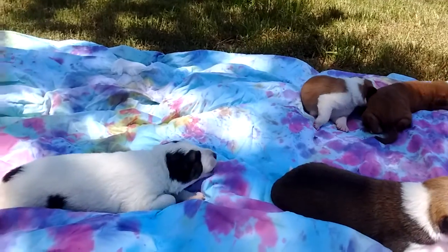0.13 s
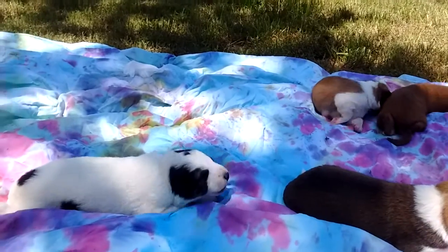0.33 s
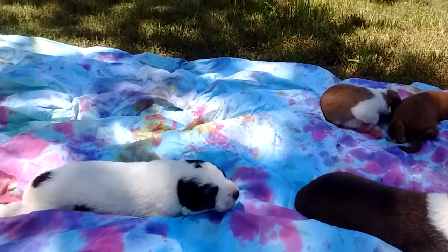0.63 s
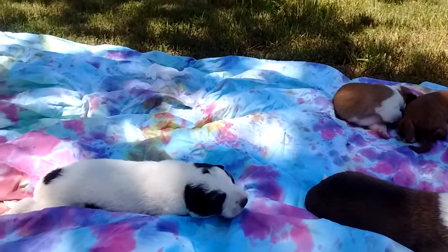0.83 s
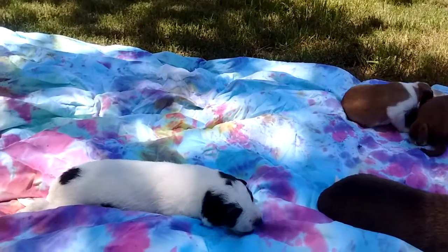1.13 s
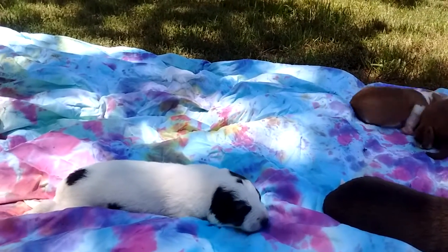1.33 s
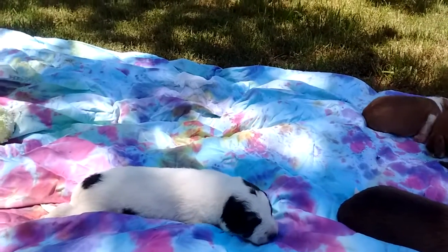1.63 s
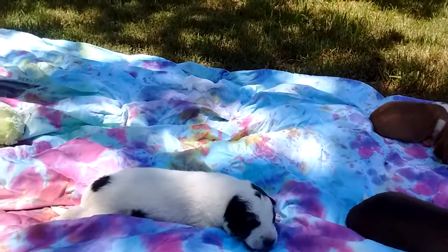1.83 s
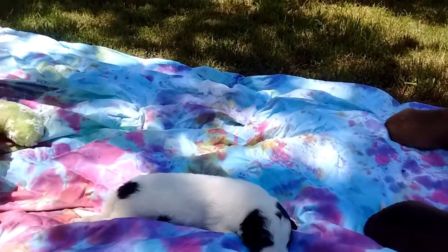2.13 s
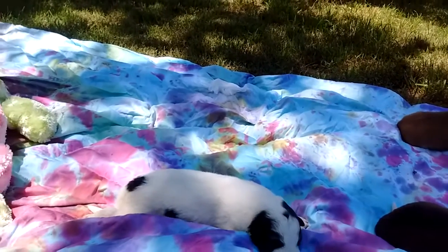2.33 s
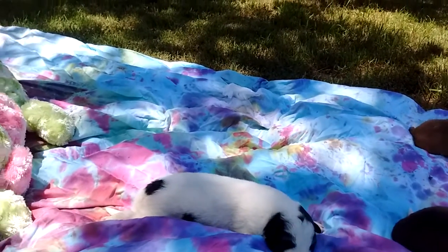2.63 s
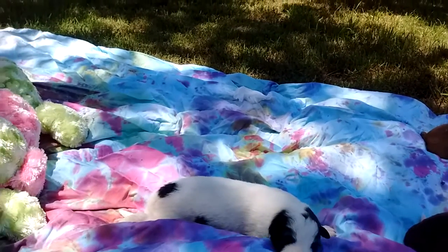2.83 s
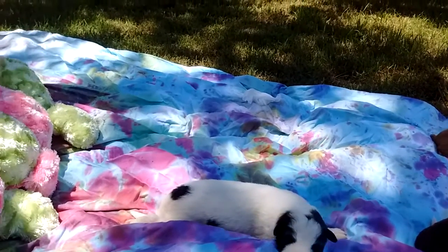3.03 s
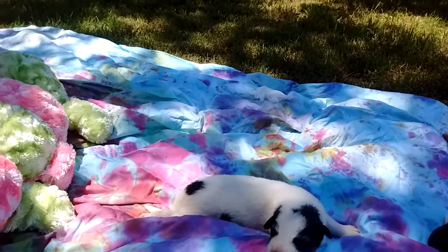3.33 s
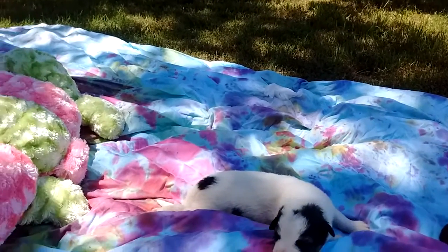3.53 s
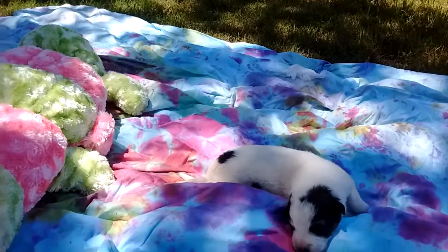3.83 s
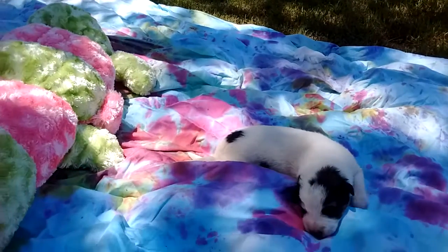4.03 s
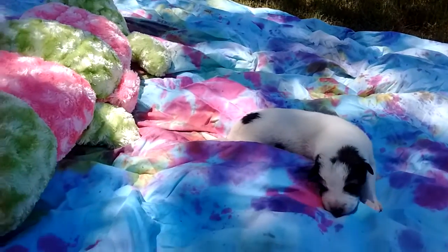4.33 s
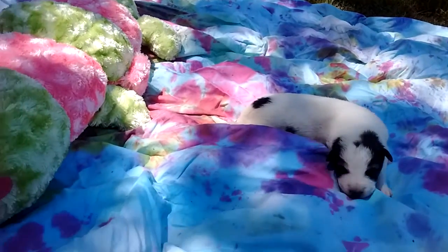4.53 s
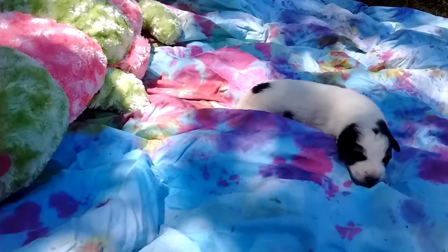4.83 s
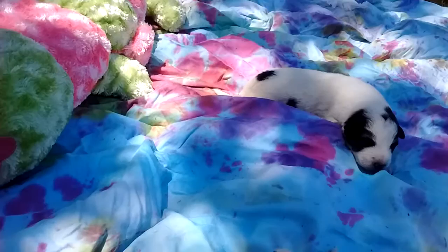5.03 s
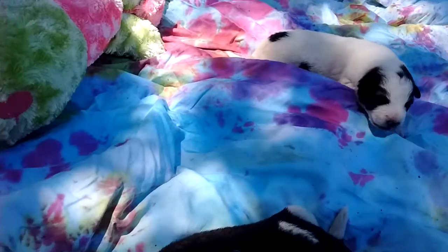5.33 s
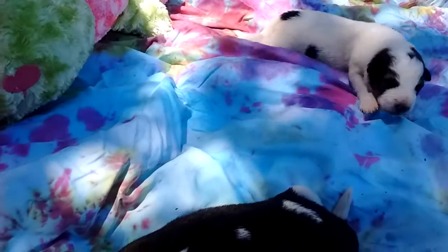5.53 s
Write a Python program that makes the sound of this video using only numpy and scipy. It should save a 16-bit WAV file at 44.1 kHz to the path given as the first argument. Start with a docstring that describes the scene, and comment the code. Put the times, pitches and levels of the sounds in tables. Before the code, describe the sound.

Outdoors, close to a small stereo microphone, a litter of puppies cries in overlapping high voices. A short whine and a squeal open, then a long howl rises and sinks; sharp yelps, whines, squeals and rasping croaks crowd around four more howls. A late pup and a small one finish. Behind them lie a faint airy hush and soft lumpy wind rumble.

```python
"""Young puppies on a blanket outdoors, close to a small two-port microphone, over a faint hush and lumpy low wind.
A far pup and a yapper open, a squeal follows and a long howl rises and sinks; then yelps, whines and squeals
overlap with four more long howls and short rasping croaks, until a latecomer and a small pup end it.
Each cry is a gliding stack of harmonics with some breath, and each pup has its own balance of the sum
and difference of the ports; a few dull reflections follow the voices."""
import sys
import numpy as np
from scipy import signal
from scipy.fft import rfft, irfft
from scipy.io import wavfile
from scipy.ndimage import uniform_filter1d, minimum_filter1d

SR = 44100
rng = np.random.default_rng(int(sys.argv[2]) if len(sys.argv) > 2 else 0)


def gain_from_db(level_db):
    """Convert decibel levels to linear amplitude factors (20 dB per decade)."""
    decades = np.asarray(level_db, float) / 20
    return 10 ** decades


def wrap_up_sound(samples):
    """Save the sound to the file named by the first command line argument, as 16-bit audio."""
    columns = np.atleast_2d(samples).T
    # keep every value between -1 and 1, then stretch to whole-number steps
    tamed = np.clip(columns, -1, 1)
    steps = np.round(tamed * 32767).astype(np.int16)
    wavfile.write(sys.argv[1], SR, steps)


N = 250047


def at_hz(points, hz):
    """Reads a spectrum on a log-frequency axis."""
    points_hz, values = np.transpose(points)
    return np.interp(np.log(hz), np.log(points_hz), values)


def rms_one(x):
    """Scales to rms 1."""
    return x / np.sqrt(np.mean(x ** 2) + 1e-20)


def drift(rate_hz, count):
    """Slow chance of rms 1: noise through two equal one-pole lowpasses at the rate."""
    r = np.exp(-2 * np.pi * rate_hz / SR)
    noise = rng.standard_normal(count + 4000)
    settled = signal.lfilter([1], [1, -2 * r, r * r], noise)[4000:]
    return rms_one(settled)


def coloured(spectrum):
    """Noise with the shape of the given spectrum, rms 1."""
    hz = np.maximum(np.fft.rfftfreq(N, 1 / SR), 1)
    white = rfft(rng.standard_normal(N))
    return rms_one(irfft(white * gain_from_db(at_hz(spectrum, hz)), N))


HUSH_SUM_DB, HUSH_DIFFERENCE_DB = -50.5, -45   # rms before the ducking
WIND_LOW_HZ, WIND_HIGH_HZ = 59, 250
WIND_SUM_DB = -27   # the sum of the ports hears less wind than the difference
# Hush of the open air in the sum of the two ports. Each row: frequency in Hz, relative density in dB per Hz.
HUSH_SUM = [(30, -49.5), (350, -26.5), (700, 10.5), (1500, 10), (2800, -5), (4500, -2.5), (6200, -16.5),
            (8300, -14), (11000, -15), (13500, -10.5), (15300, -27)]
# The same hush in their difference. Each row: frequency in Hz, relative density in dB per Hz.
HUSH_DIFFERENCE = [(30, -15), (120, -11), (400, -8), (900, -7.5), (2000, -22), (4500, -38.5), (6200, -25.5),
                   (8300, -37.5), (15300, -31)]
# Wind on the ports, mostly opposed in the two channels. Each row: time in seconds, level in dB before the lumps.
WIND = [(0, -42), (.5, -62.5), (.8, -37.5), (1.1, -54.5), (1.5, -45.5), (2, -53), (2.301, -32),
        (2.6, -61.5), (3.2, -53.5), (3.898, -53), (4.1, -49), (4.4, -43.5), (4.899, -64.5), (5.201, -35),
        (5.67, -53)]


def outdoors():
    """Steady coloured hush, and wind as a low noise band whose level wanders in lumps."""
    band = signal.butter(2, [WIND_LOW_HZ, WIND_HIGH_HZ], "band", fs=SR, output="sos")
    lumps_db = 9 * np.minimum(drift(8, count=N), 1)
    gust_db = np.interp(np.arange(N) / SR, *np.transpose(WIND)) + lumps_db
    rumble = rms_one(signal.sosfilt(band, rng.standard_normal((2, N))))
    wind = gain_from_db(gust_db) * rumble * gain_from_db([[WIND_SUM_DB], [0]])
    hush_sum = gain_from_db(HUSH_SUM_DB) * coloured(HUSH_SUM)
    hush_difference = gain_from_db(HUSH_DIFFERENCE_DB) * coloured(HUSH_DIFFERENCE)
    return wind + np.array([hush_sum, hush_difference])


DUCK_KNEE_DB, DUCK_SHARE = -38, .32


def ducking(voices):
    """Gain control: the background sinks by a share of the voices' excess over the knee."""
    power = uniform_filter1d((voices ** 2).sum(axis=0), size=2600)
    loud_db = 10 * np.log10(np.abs(power) + 1e-12)
    return gain_from_db(-DUCK_SHARE * np.maximum(loud_db - DUCK_KNEE_DB, 0))


# Reflections from the ground and nearby things. Each row: delay in seconds, level in dB.
ECHOES = [(.011, -31.5), (.023, -28), (.047, -31.5)]


def echoes(x):
    """Adds a few dull reflections, each with sum and difference exchanged."""
    dull = signal.lfilter([.3], [1, -.7], x)
    out = x.copy()
    for delay_s, db in ECHOES:
        delay = round(delay_s * SR)
        out[:, delay:] += gain_from_db(db) * dull[::-1, :N - delay]
    return out


CROAK_HOARSE, CROAK_PUP, CROAK_HEADING = .6, "yelper", 90.5   # heading in degrees
CROAK_EDGE, CROAK_SAG = .08, .03   # shares: of the length at each end, of the pitch lost by the end
CROAK_END_BOOST_DB = 3   # both ends are louder than the middle
CROAK_OPEN_DB, CROAK_BRIGHT_DB, CROAK_TREBLE_DB = 19, 2, -47
# Short rasping croaks and voice breaks.
# Each row: start in seconds, length in seconds, pitch in Hz, voice level in dB, overtone level in dB.
CROAKS = [(0.0, 0.033, 640, -43, -51), (0.552, .02, 707, -45.5, -44), (1.223, 0.15, 355.4, -49, -49),
          (1.36, .13, 560.5, -36, -44), (1.64, 0.076, 449.6, -36.5, -55), (1.865, .045, 391, -38, -52),
          (2.07, .045, 332, -43, -40), (2.16, 0.053, 717, -38.5, -53), (2.281, .04, 677, -35, -39.5),
          (2.371, 0.028, 615, -43, -53), (2.64, 0.047, 466, -46.5, -41.5), (2.91, 0.02, 611, -44, -35),
          (3.575, .06, 1558, -39.5, -52), (3.91, 0.063, 748, -45.5, -49), (4.084, 0.1, 476.3, -34.5, -48),
          (4.89, .05, 403, -52, -52), (5.06, .06, 632, -41.5, -50)]


def croaks():
    """Hoarse, short calls that break in and out abruptly while the pitch sags."""
    calls = []
    for s, length, hz, db, over_db in CROAKS:
        rows = []
        for part in (0, CROAK_EDGE, 1 - CROAK_EDGE, 1):
            level_db = db + CROAK_END_BOOST_DB * (part in (0, 1))
            pitch = hz * (1 - CROAK_SAG * part)
            rows.append((s + length * part, pitch, level_db, CROAK_OPEN_DB, CROAK_BRIGHT_DB))
        calls.append((rows, CROAK_HOARSE, CROAK_PUP, CROAK_HEADING, over_db, CROAK_TREBLE_DB))
    return calls


TREBLE_HZ = 6300   # overtones from here up follow the treble level
OVER_FOLLOWS, OVER_OCTAVES = 1.136, 1.199   # overtones: share of the opening, octaves of brightness
TREBLE_FOLLOWS, TREBLE_OCTAVES = 0.87, 0.75   # the same for the treble overtones
BRIGHT_FROM_HZ = 1497   # brightness tilts the spectrum above this
BRIGHT_OCTAVES = 1.4   # the three lowest harmonics tilt over at most this span
SKEW_RAD = 0.13   # phase lead of the difference over the sum
PORT_LAG_S = 2e-5   # extra lead of the difference, which grows into phase with frequency
# The three lowest harmonics through a closed mouth. Each row: frequency in Hz, level in dB.
MOUTH = [(500, 0), (1000, 0), (1500, -5), (2200, -16), (3300, -29), (4800, -29.5)]
# How far those harmonics follow the opening of the mouth. Each row: frequency in Hz, share.
OPENING = [(600, .01), (900, 0.13), (1200, 0.17), (1600, 0.96), (2300, 0.85), (3300, 0.67)]
# Colour of the overtones through throat and microphone port. Each row: frequency in Hz, level in dB.
OVERTONES = [(1500, 35.5), (2600, 22.5), (3800, 9.5), (5000, -2), (6000, -28), (6800, -6.5), (7900, 10.5),
             (8700, 7), (9400, -8.5), (10200, -1), (11500, -14), (13500, -25), (15500, -34)]
# Frequencies at which the bearing of a pup is given. One column: frequency in Hz.
BEARING_HZ = [550, 950, 1500, 2200, 3300, 4800, 8000]


def cry(rows, bearing, hoarse, over_db, treble_db):
    """Harmonics on the gliding pitch of the vocal folds; returns first sample and (sum, difference)."""
    s, *columns = np.transpose(rows)
    at = np.arange(int(s[0] * SR), min(int(s[-1] * SR), N))
    pitch, voice_db, open_db, bright_db = [np.interp(at / SR, s, c) for c in columns]
    pitch = uniform_filter1d(pitch, size=500, mode="nearest")   # the larynx rounds every turn of pitch
    glide = np.abs(np.gradient(np.log(pitch))) * SR
    hoarse = hoarse + .006 * np.minimum(glide, 15)   # fast glides rasp
    waver = 0.0038 * drift(21.1, count=len(at))
    rasp = 0.05 * hoarse * drift(190, count=len(at))
    pitch = pitch * (1 + waver + rasp)
    phase = 2 * np.pi * np.cumsum(pitch) / SR

    # levels move slowly, so they are computed at every 32nd sample
    step, out = at[::32], np.zeros((2, len(at)))
    voice_db, open_db, bright_db = voice_db[::32], open_db[::32], bright_db[::32]
    for k in range(1, int(15000 / pitch.min()) + 1):
        hz = k * pitch[::32]
        octaves = np.log2(hz / BRIGHT_FROM_HZ)
        if k <= 3:
            tilt_db = bright_db * np.clip(octaves, 0, BRIGHT_OCTAVES)
            shape_db = at_hz(MOUTH, hz) + at_hz(OPENING, hz) * open_db + tilt_db
        else:
            tilt_db = bright_db * np.clip(octaves, 0, OVER_OCTAVES)
            middle_db = over_db + OVER_FOLLOWS * open_db + tilt_db
            high_db = treble_db + TREBLE_FOLLOWS * open_db + TREBLE_OCTAVES * bright_db
            shape_db = np.where(hz < TREBLE_HZ, middle_db, high_db)
            shape_db = shape_db + at_hz(OVERTONES, hz) + rng.normal(0, 1.5)
        height = np.sqrt(2) * gain_from_db(voice_db + shape_db) * (hz < 15600)
        # the bearing divides each harmonic between sum and difference
        angle = np.radians(at_hz(np.transpose([BEARING_HZ, bearing]), hz))
        turn = k * phase + rng.uniform(0, 2 * np.pi)
        lead = SKEW_RAD + 2 * np.pi * k * pitch * PORT_LAG_S
        out[0] += np.interp(at, step, height * np.cos(angle)) * np.sin(turn)
        out[1] += np.interp(at, step, height * np.sin(angle)) * np.sin(turn + lead)

    edge = np.clip(np.minimum(at - at[0], at[-1] - at) / (.007 * SR), 0, 1)
    shimmer = gain_from_db(5.1 * hoarse * drift(120, count=len(at)))   # uneven cycles
    # strong-weak cycles come and go
    shimmer *= 1 + 0.27 * hoarse * drift(30, count=len(at)) * np.sin(phase / 2)
    return at[0], out * edge * shimmer


BREATH_DB = -40.5   # relative to the voices, before the patches
# Breath noise of the pups. Each row: frequency in Hz, relative density in dB per Hz.
BREATH = [(300, -72), (900, 28.5), (1700, -30), (2600, 5), (4000, 15.5), (6000, -54), (8200, 21.5),
          (11000, -44), (15500, -51.5)]
# Where each pup lies, as the ports hear it. Each entry: the pup, then degrees at each of BEARING_HZ
# (0 both channels in step, 90 opposed).
BEARINGS = {"far": (3, 8, 8, 10, 93, -16, -4.5), "small": (76, 32, 2, -28, -106, -167, -167),
            "right, turned": (-52, -29, -6, 3, 67, 35, 31), "grumbler": (84, 47, -24, 43, 64, 80, 24),
            "howler, head up": (72.5, 62.5, -1.5, -43, -56.5, -21, -21),
            "howler, turned": (78.5, 62, -2.5, -14, -46, -64.5, -170),
            "wailer": (91, 78, 71.3, 69.4, 79.6, 72.8, 65),
            "whiner, turned": (89, 71.5, 136, 113, 56.5, 38, 20.7),
            "squealer": (30, 69, 116, 83.3, 83.3, 100, 128),
            "howler": (66.5, 47.5, -11.5, -25, -100, -170, -165),
            "yelper": (84.2, 84.7, 53.6, 66, 80.5, 75.2, 57.4),
            "right": (-33, -28.5, 1, -3.5, 62, 20, 37.5), "yapper": (120, 55, 14, 62.6, 74, 38, 30),
            "whiner": (71, 73, 114.2, 108, 74, 60, 45), "latecomer": (85.5, 83, 1.5, -85, -90, -173, -160)}
# The cries, one list each. Each row: time in seconds, pitch in Hz, voice level in dB, mouth opening in dB,
# brightness in dB per octave.
CRIES = [
    [(0.0, 931, -26.5, 13.5, -1), (0.048, 876, -32.5, 17.5, -22), (0.064, 841, -31.5, 13.5, -11),
     (0.092, 928, -23, 1.5, 23)],
    [(0.04, 637, -30, -3, 4), (0.104, 938, -28.5, 6, 20), (0.148, 1168, -44.5, 31, 21),
     (0.162, 1210, -43, 29, -15)],
    [(0.165, 1610, -13, 27.5, -5.5), (0.176, 1620, -28.5, 27, -21.5), (0.2, 1434, -32.5, 21, 22),
     (0.268, 1318, -38, 26, 1.5), (0.292, 1134, -38.5, 28.5, 17.5), (0.33, 1035, -40.5, 16.5, 21.5)],
    [(0.335, 1000, -38, 19, 18), (0.392, 936, -37.5, 41, -2), (0.436, 928, -34, 23.5, -5),
     (0.456, 881, -30, 9, -5), (0.548, 872, -29, -11, 13), (0.614, 913, -32, 7, 2.5),
     (0.68, 900, -31.5, 16, -6), (0.704, 902, -36.5, 16, 1.5), (0.766, 896.6, -30.5, -6, 5),
     (0.828, 854, -22, 7.5, -16)],
    [(0.13, 388, -37.5, 6, 2.5), (0.166, 543, -28.5, 19, 19), (0.198, 709, -27.5, 25.5, 5),
     (0.222, 803, -35, 32, 12), (0.23, 821.6, -29.5, 29.5, 4), (0.262, 793, -38.5, 37.5, -1.5),
     (0.282, 730, -32, 8, 10), (0.298, 739, -31.5, 8.5, 3), (0.35, 703, -34.5, 32, -10),
     (0.37, 663, -29.5, 16, -4), (0.39, 637, -32, 2, 19), (0.452, 639, -31.5, -5.5, 21),
     (0.514, 627, -31.5, -3, 9), (0.594, 602.3, -29.5, -2, 0), (0.696, 596, -28, -7.5, 13),
     (0.798, 588, -26, 5, -7.5), (0.874, 537, -26.5, 0.5, -3), (0.97, 445, -30.5, -9, 12),
     (1.026, 411, -38.5, 18.5, -7), (1.054, 419, -52, 15, 19)],
    [(0.36, 776, -45, 8, 7), (0.376, 824, -33.5, 37, -4.5), (0.408, 977, -33, 36.5, -7),
     (0.432, 923, -39, 47, -10), (0.46, 1091, -24.5, 14, -4), (0.485, 1027, -28.5, 5, 3.5),
     (0.548, 1029, -27.5, 9, -1), (0.58, 1175, -27.5, 19.5, -1.5), (0.607, 1133, -29.5, 34, -10),
     (0.624, 963, -35.5, 47.5, -24), (0.7, 1023, -34, 39.5, -17), (0.728, 721, -42, 13, 0)],
    [(0.915, 708, -36, 15, -7), (0.935, 777, -38.5, 32.5, -5), (0.951, 815, -35, 27.5, 2),
     (0.979, 1200, -15.5, 24, 3.5), (1.0, 1242, -17, 11, 14), (1.039, 1297, -15.5, 18, 1),
     (1.071, 1268, -16, -6.5, 7), (1.12, 1162, -34.5, -11.5, 25), (1.167, 1057, -36.5, 15, 8.5),
     (1.195, 1126, -32, 1, 11), (1.219, 905, -32, 17.5, -2)],
    [(1.3, 390.8, -44.5, 14.5, 11), (1.34, 503, -37, 10, 10), (1.364, 596, -31.5, 32.5, 1),
     (1.4, 754, -27.5, 19.5, 15), (1.448, 762, -25, 24.5, 5), (1.484, 673, -28.5, 8.5, 5.5),
     (1.51, 642, -29, 13, 12), (1.544, 575, -32, 29.5, -17), (1.6, 531, -33, 17, -1.5),
     (1.64, 536, -30, 19, -3), (1.68, 567, -26, 27.5, -17), (1.712, 654, -32, 42, -9),
     (1.76, 739, -27.5, 28.5, -5), (1.772, 743, -32, 37, -4.5), (1.832, 745, -31, 28, -12),
     (1.884, 720, -25.5, 23.5, -1.5), (1.98, 610, -30, 36, -17), (2.05, 560, -29.5, 23, -3),
     (2.12, 517, -32.5, 25.5, -2.5), (2.164, 564, -31, 4, 20)],
    [(1.66, 655, -26, 1, 20), (1.716, 865, -15, -21, 30), (1.756, 939, -31, -3, 17),
     (1.78, 950, -25, -12.5, 32), (1.8, 1030, -30, 8, 17), (1.828, 950, -37.5, 10, 23),
     (1.852, 1020, -32, 27.5, 4)],
    [(2.13, 669, -19, 24, 8.5), (2.17, 755, -22.5, -18, 11), (2.21, 932, -10.5, -14, 0),
     (2.238, 971, -18.5, 9.5, -3.5), (2.278, 937, -16.5, 4.5, 18), (2.29, 994, -16, 12, 7)],
    [(2.31, 920, -42, 12, 8), (2.318, 898, -26, 19, -2.5), (2.362, 645, -34, -3, 5),
     (2.398, 606, -31, 18.5, 5)],
    [(2.4, 443, -34.5, 19, 12), (2.428, 607, -27, 22.5, 20), (2.44, 707, -33, 29.5, 16.5),
     (2.48, 856, -27.5, 17, 27), (2.512, 849, -30.5, 35.5, -1), (2.54, 817, -32, 10.5, -26),
     (2.608, 875, -28.5, 2, -5)],
    [(2.49, 670, -45, -17.5, 26), (2.532, 766, -40, 33.5, -6.5), (2.56, 781, -36, 15.5, -5.5),
     (2.624, 775, -32, 27.5, -16.5), (2.656, 781, -33.5, 15, -13.5), (2.72, 815, -31, 24.5, -23),
     (2.74, 767, -30, 27, -25), (2.756, 786, -37, 29.5, -15), (2.796, 781, -29, 8.5, -14),
     (2.86, 741.6, -33, 10.5, -7), (2.924, 686, -30.5, -6.5, 5.5), (3.0, 651, -29.5, -6.5, -7),
     (3.064, 582, -32, 14.5, -34), (3.128, 526, -34, 12, -36), (3.18, 466, -37.5, -9, 25)],
    [(2.65, 801, -37, 23, -9), (2.674, 816, -30.5, 0, -14), (2.69, 894, -26.5, 22.5, 4.5),
     (2.738, 970, -22, -5.5, 38.5), (2.774, 1156, -29, 22, 14.5)],
    [(2.775, 1634, -24, 27, 19), (2.783, 1645, -23.5, 24.5, -0.5), (2.847, 1411, -26.5, 15, 2),
     (2.903, 1316, -30.5, 15, -11.5), (2.923, 1166, -19.5, -4, 13.5), (2.935, 902, -21, -1, -3)],
    [(2.87, 527, -39, 6, -6), (2.926, 778, -37, 5, 24), (2.95, 872, -31.5, -0.5, 18.5),
     (2.998, 893, -32.5, -7.5, 19), (3.034, 823, -22.5, -21, 15)],
    [(3.12, 603, -47.5, 18.5, 12), (3.16, 869, -14, -7.5, 26), (3.2, 976, -26.5, 20, 22),
     (3.228, 1121, -30, 29, 16.5), (3.248, 1151, -37, 50.5, -0.5), (3.264, 1120, -34.5, 49, 0)],
    [(3.24, 601, -40, 25, 23), (3.264, 705, -40.5, 16, 13), (3.288, 773, -25, 11, -33),
     (3.36, 720, -26, -12, -2), (3.428, 700, -39.5, 8, 17)],
    [(3.265, 1560, -10, 11, 14.5), (3.277, 1551, -30.5, 19, 10), (3.377, 1408, -30, 11, 11),
     (3.453, 1387, -13, 5.5, 3.5), (3.489, 1330, -64, 5, 4)],
    [(3.395, 415, -44, 21, 1), (3.419, 543, -34, 25.5, 5), (3.451, 738, -29, 24, 10),
     (3.491, 838, -29.5, 31.5, -0.5), (3.515, 800, -34, 34.5, -8), (3.563, 796, -27, -25, -13),
     (3.579, 788, -30.5, 21, -20), (3.599, 718, -32.5, 24, -23), (3.615, 741, -32.5, 13.5, 9),
     (3.655, 697, -27.5, -10.5, 3), (3.725, 658, -31.5, -1.5, -4), (3.795, 622, -26, 2, 18),
     (3.855, 668, -27.5, 1, 0), (3.907, 645, -30, 2, 13), (3.96, 655, -27.5, 0.5, 3),
     (4.04, 618, -28.5, -0.5, 5), (4.123, 562, -27.5, 4.5, 15.5), (4.159, 494, -29.5, 9.5, 1),
     (4.179, 473, -30, 12, -3), (4.239, 464, -40.5, -5, 20), (4.299, 429, -33.5, -9, 12)],
    [(3.455, 916, -35, 19, 14), (3.499, 908, -45.5, 36, -2), (3.551, 829, -34, 21, -13.5),
     (3.579, 880, -31, 18, -14)],
    [(3.73, 580, -25, -10, 1), (3.754, 682, -43, 27.5, 16.5), (3.782, 864, -24, 22.5, 26),
     (3.818, 948, -20, 2, 28), (3.858, 1060, -23, 35, 9.5), (3.914, 1027, -20, 35, -15.5),
     (3.942, 1051, -28.5, 34.5, 1), (4.006, 1025, -30.5, 45, -16), (4.07, 1001, -19, 24, -10),
     (4.09, 1032, -21, 20, 7)],
    [(4.178, 944, -21.5, 21.5, -15), (4.25, 904, -22, 17.5, -13), (4.338, 828, -28, 17.5, -8.5),
     (4.358, 892, -19.5, 8, -14), (4.378, 749, -43, -6, -4)],
    [(4.28, 586, -43.5, 7, 13), (4.336, 710, -40.5, 6, -3), (4.408, 683, -43.5, 4, 10),
     (4.432, 635, -34, -13, 23)],
    [(4.54, 575, -28, 5, -12), (4.572, 635, -37, 22, -13), (4.6, 870, -22.5, 14.5, -1),
     (4.62, 962, -22.5, 17.5, 10.5), (4.692, 1020, -27, 34, -8), (4.712, 1039, -27, 30, 1)],
    [(4.56, 386, -38, 22, -5), (4.6, 532, -31, 23, 9), (4.636, 727, -28.5, 21.5, 8.5),
     (4.672, 786, -28.5, 20.5, 16.5), (4.7, 769, -32.5, 30.5, -12), (4.72, 685, -30, 6, -13),
     (4.76, 685, -33, 8, -4), (4.78, 600, -34, 26, -18), (4.868, 562, -34.5, 20, -17),
     (4.928, 597, -28.5, 26, -17.5), (4.98, 729, -31.5, 32, -11.5), (5.015, 784, -28, 24, -18),
     (5.048, 842, -26, 22, -10.5), (5.09, 838, -22.5, 4.5, -11), (5.124, 818, -25, 25, -13.5),
     (5.155, 788, -28, 22, -8), (5.18, 756, -20, -14.5, 3), (5.216, 728, -29, 19, -43),
     (5.252, 646, -23, 2, -19), (5.316, 578, -28, 9, -4), (5.388, 520, -30, -6, 6),
     (5.46, 435, -37, -4, 10)],
    [(4.71, 1510, -25, 36, 3), (4.718, 1520, -35, 27, 7), (4.742, 1422, -32, 18.5, 12),
     (4.822, 1262, -44.5, 29, 5.5), (4.838, 1210, -29, 20, 11)],
    [(4.84, 841, -25.5, 10, 11.5), (4.86, 754, -44.5, 28, -10), (4.88, 680, -39, 22.5, -3),
     (4.92, 662, -39, 10, 7.5), (4.944, 790, -38, 3, 27)],
    [(5.16, 480, -29, 19, -28.5), (5.208, 742, -37, 25.5, 17), (5.224, 792, -25, 33, 10.5),
     (5.26, 853, -12.5, 14.5, 15.5), (5.31, 833, -32, 31.5, 1.5), (5.356, 791, -33.5, 21.5, 3),
     (5.4, 695, -40.5, 21.5, 4), (5.46, 703, -38, 14, 8), (5.52, 711, -37.5, 16, -5),
     (5.57, 675, -33.5, -3, 13), (5.636, 641, -39.5, 16.5, 7), (5.664, 770, -44, -8, 7)],
    [(5.47, 680, -52.5, 17.5, 5), (5.526, 941, -31.5, -4, 1), (5.574, 1011, -39.5, 23.5, -5),
     (5.606, 1083, -35.5, 4, -3), (5.666, 1076, -38, 0, 7)],
]
# Hoarseness of each cry before its glides add rasp. One column: share (0 clear, 1 rasping).
HOARSE = [.08, .06, .08, .1, .04, .1, .03, .04, .3, .22, .35, .06, .04, .06, .06, .15, .04, .06, .04, .03,
          .3, .05, .05, .08, .08, .04, .06, .1, .04, .04]
# Who gives each cry. Each row: pup, heading of the head in degrees (90 straight on), overtone level in dB,
# treble overtone level in dB.
CRIERS = [("far", 88, -45, -55), ("yapper", 92.8, -36, -52), ("yapper", 108, -46.5, -59),
          ("yapper", 107.5, -50.5, -58.5), ("howler", 105.3, -49.5, -52.5), ("right", 92.5, -49, -56.5),
          ("right, turned", 91.4, -46.5, -47.5), ("howler, head up", 94, -54.5, -51),
          ("yapper", 96.6, -55, -45.5), ("yelper", 89.3, -50.5, -52), ("whiner", 102.4, -46.5, -44),
          ("howler", 107.3, -62, -53), ("howler", 98.7, -39.5, -41), ("yelper", 90.3, -49, -49),
          ("squealer", 94.5, -50, -50), ("grumbler", 91, -58.5, -58), ("wailer", 93.9, -49.5, -53),
          ("whiner", 89, -53, -62), ("squealer", 93.2, -45.5, -53.5), ("howler, turned", 89.4, -53, -53.5),
          ("yelper", 85, -43, -43), ("wailer", 96.3, -57.5, -56.5), ("whiner", 94, -42, -45.5),
          ("howler", 95, -48, -45.5), ("whiner, turned", 86.8, -47, -54), ("howler", 100.9, -51, -50),
          ("yapper", 100, -53, -46.5), ("yapper", 100, -47, -45), ("latecomer", 91, -50, -51),
          ("small", 91, -43, -63)]


def litter():
    """All cries and croaks, with breath noise that follows their loudness in patches."""
    out = np.zeros((2, N))
    calls = [(rows, hoarse, *crier) for rows, hoarse, crier in zip(CRIES, HOARSE, CRIERS)]
    for rows, hoarse, pup, heading, over_db, treble_db in calls + croaks():
        bearing = np.add(BEARINGS[pup], heading - 90)
        start, sound = cry(rows, bearing, hoarse, over_db, treble_db)
        out[:, start:start + sound.shape[1]] += sound
    effort = np.sqrt(np.abs(uniform_filter1d(out ** 2, size=600)))
    patches_db = 4.1 * drift(12, count=N)
    air = np.array([coloured(BREATH), coloured(BREATH)])
    return out + gain_from_db(BREATH_DB + patches_db) * effort * air


def scene():
    """The litter over the ducked outdoors; sum and difference become left and right."""
    voices = echoes(litter())
    both, apart = voices + ducking(voices) * outdoors()
    return np.array([both + apart, both - apart])


LIMIT, RELEASE_DB_PER_S = .98, 40   # limit as a share of full scale


def limiter(x):
    """Looks 3 ms ahead and turns both channels down so that peaks stay under the limit."""
    over_db = np.maximum(20 * np.log10(np.abs(x).max(axis=0) / LIMIT + 1e-9), 0)
    fall = RELEASE_DB_PER_S * np.arange(N) / SR
    held_db = np.maximum.accumulate(over_db + fall) - fall
    ahead_db = minimum_filter1d(-held_db, size=265)
    return x * gain_from_db(uniform_filter1d(ahead_db, size=132))


def band_limit(x):
    """A steep low-pass at the top of the band."""
    return signal.sosfilt(signal.butter(12, 15680, fs=SR, output="sos"), x)


BASS_CUT_HZ = 26


def record(dry):
    """The microphone drops the deepest bass, then the limiter holds the peaks."""
    bass_cut = signal.butter(2, BASS_CUT_HZ, "high", fs=SR, output="sos")
    mix = limiter(signal.sosfilt(bass_cut, dry))
    return band_limit(mix)


dry = scene()
out = record(dry)
wrap_up_sound(out)
```